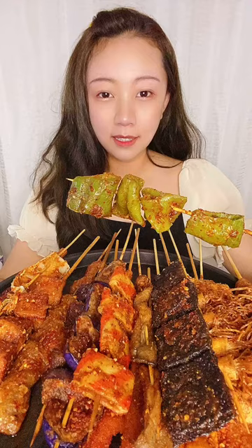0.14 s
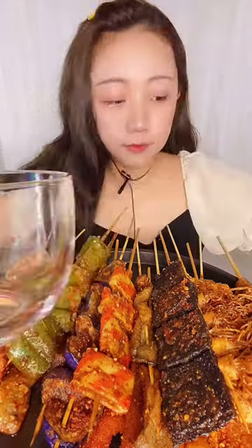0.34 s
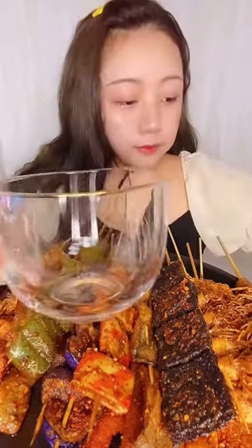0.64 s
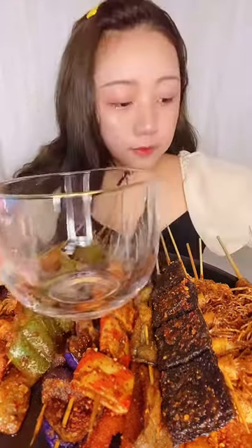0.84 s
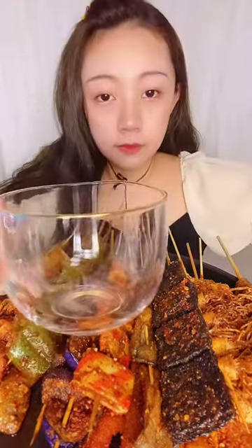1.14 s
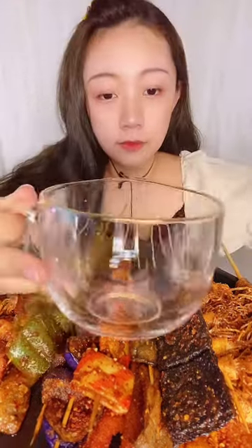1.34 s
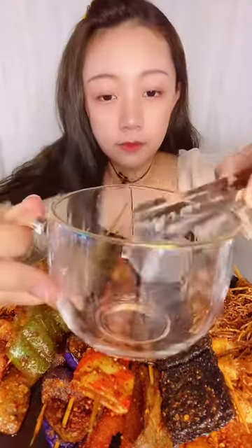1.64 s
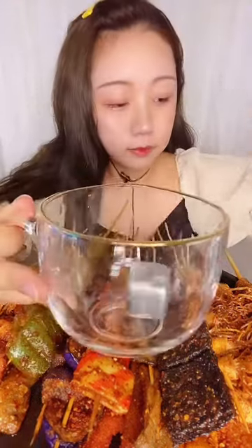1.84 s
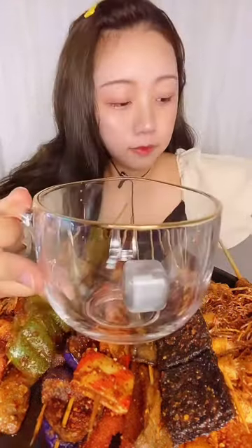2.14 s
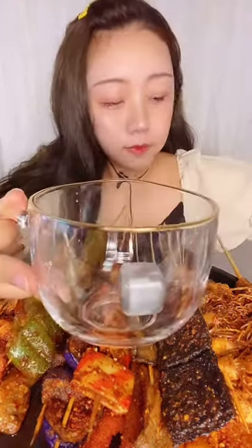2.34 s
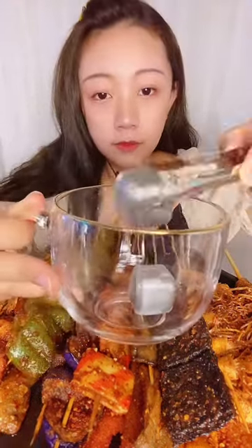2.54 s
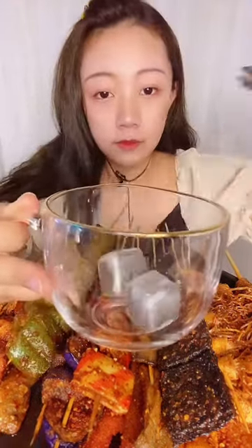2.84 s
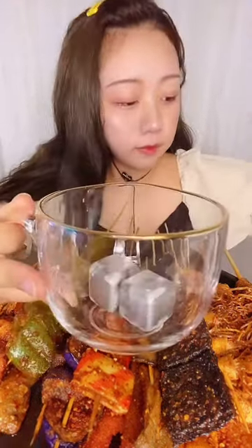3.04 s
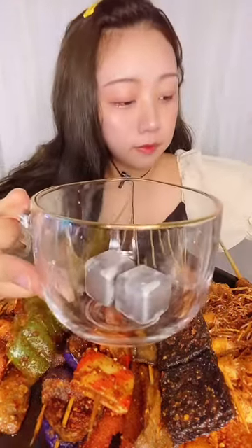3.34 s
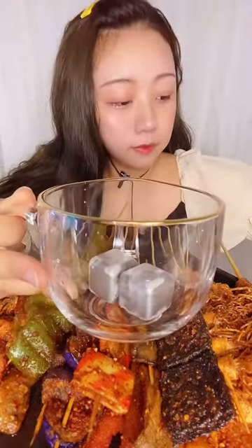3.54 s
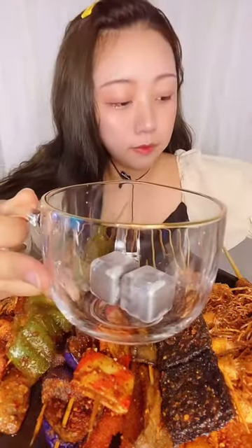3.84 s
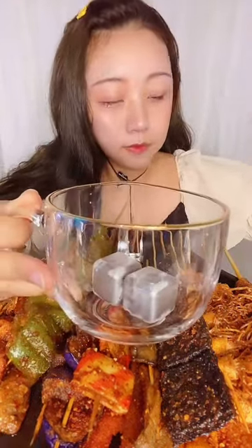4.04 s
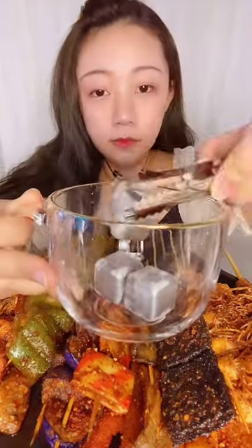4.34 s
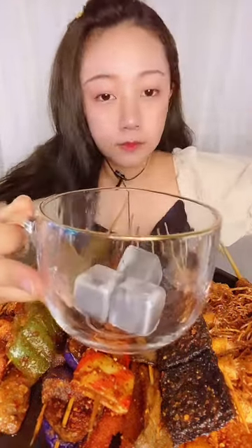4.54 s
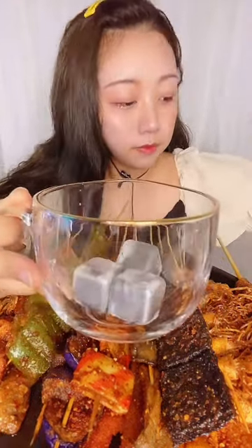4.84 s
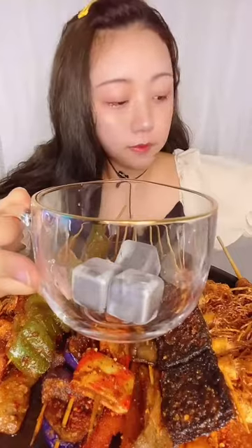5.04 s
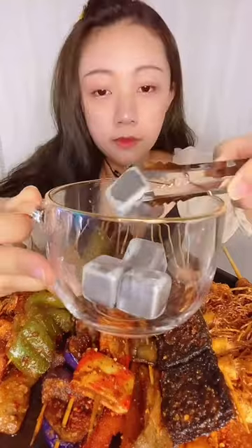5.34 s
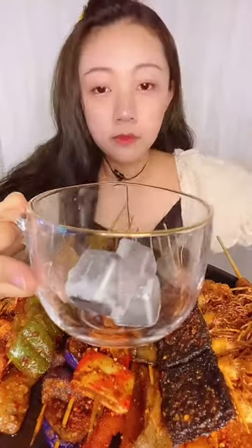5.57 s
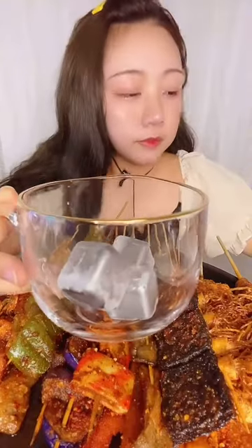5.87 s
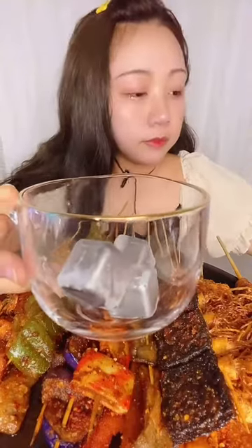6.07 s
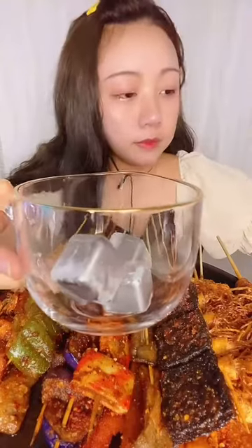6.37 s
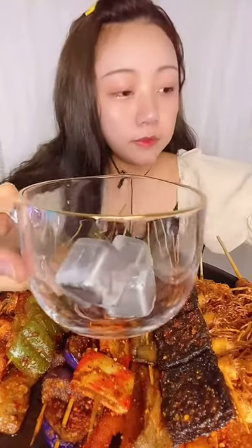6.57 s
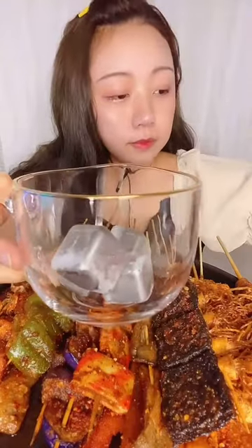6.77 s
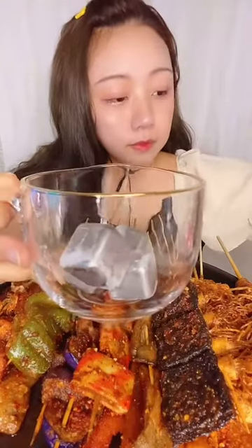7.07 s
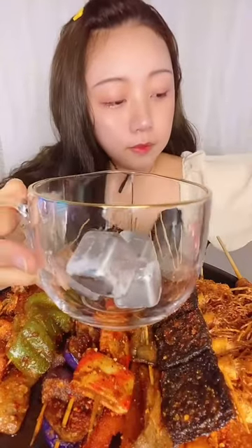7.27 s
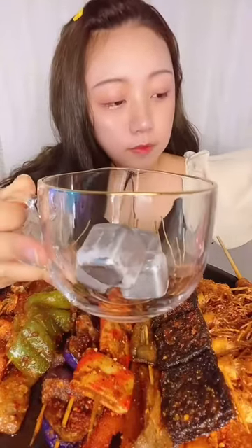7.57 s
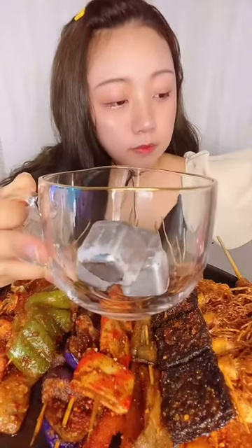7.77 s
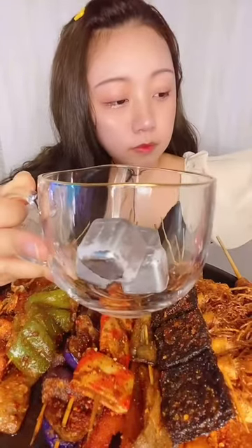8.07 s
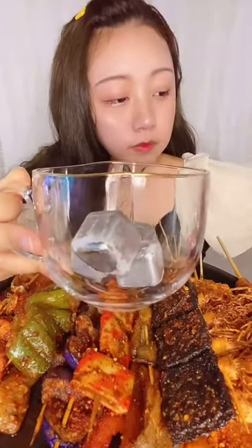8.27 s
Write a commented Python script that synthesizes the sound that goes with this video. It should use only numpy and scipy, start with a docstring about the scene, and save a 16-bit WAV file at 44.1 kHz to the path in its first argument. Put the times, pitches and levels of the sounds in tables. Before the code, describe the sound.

Silence for the first half second, then quiet room air with deep low rumble. Faint clicks and scrapes on a table from 0.5 to 1.3 s, with a soft thump near 1.2. At 1.6-2.0 an ice cube knocks and bounces in a glass mug very close by. Sharp table click at 2.25; a faint rim tap at 2.8, then a second cube clatters and slides at 3.0. Small clicks, scrapes and knocks run from 3.3 to 4.1. A third cube lands at 4.55 with a clearer glassy ring, and a fourth, loudest, at 5.55, followed by a bright metal tap on glass at 5.67. Tongs knock down at 6.1-6.6 with a tiny squeak; a heavy, boomy thud comes at 7.0. Can clicks begin at 7.25, a fierce whistling gas hiss bursts at 7.65 and fades within about 0.15 s. Tab ticks from 8.0, then the lid cracks at 8.17 with quickly fading fizz.

```python
"""A small room: ice cubes are dropped from metal tongs into a glass mug held close to the microphone.
Cubes strike, bounce and slide round the bowl (contact noise plus decaying modes); things click, scrape
and bump on the table (filtered noise). The tongs are laid down, a cola can is handled, its gas escapes
with a short whistling hiss (noise through resonances), the lid cracks open and the cola fizzes."""
import sys
import numpy as np
from scipy import signal
from scipy.fft import rfft, irfft
from scipy.io import wavfile

SR = 44100
rng = np.random.default_rng(int(sys.argv[2]) if len(sys.argv) > 2 else 0)


def to_wav(sig):
    """Store sig (one row per channel, or 1-D mono) as 16-bit WAV at the path in sys.argv[1].

    Samples outside -1..1 are clipped; the rate is SR.
    """
    pcm = np.clip(np.atleast_2d(sig), -1, 1) * 32767
    pcm = np.round(pcm).astype(np.int16)
    wavfile.write(sys.argv[1], SR, pcm.T)  # frames by channels


N = 370881
SIZE = 16384  # samples in one contact, ring or room tail
OPEN_S = 8.166  # the lid gives way

# Contact colours. Each row: frequency in Hz, relative density in dB per Hz.
ICE_COLOUR = [(150, -50), (450, -13.5), (700, -5.5), (950, 10.5), (1350, 4.5), (1750, -4.5), (2200, 4.5),
              (2750, -5), (6300, -1.5), (9000, -14), (11500, -10.5), (13000, -3.5), (14300, -4.5),
              (16000, -56.5)]
TABLE_COLOUR = [(100, -12.5), (200, -13), (370, -3.5), (570, -2.5), (750, -8), (1300, -7.5), (1900, -14),
                (2700, -12), (5700, -22), (9500, -25.5), (14000, -33.5), (16000, -48)]
CAN_COLOUR = [(120, -65.5), (200, -29.5), (491, -17), (569, -14), (899, -6.5), (1120, -14), (1740, -4.5),
              (2960, -14.5), (3760, -6.5), (5130, -12.5), (7970, -12.5), (8580, -15.5), (16000, -35)]

# Modes of the mug wall, of the wall split by the handle, of the air in the bowl and of the table top.
# Each row: frequency in Hz, relative level in dB, undamped t60 in s.
WALL_MODES = [(1495, 0, .25), (2165, -19, .2), (3210, -4, .2), (3236, -9, .18), (4500, -19, .2),
              (5665, -5, .15), (6290, -13, .13), (8300, -16, .14), (13100, -12, .11), (13600, -12, .1)]
TWIN_MODES = [(1362, -10, .25), (3460, -4, .3), (4683, -18, .18), (5674, 1, .22), (5720, -7, .12),
              (6180, -12, .1), (6874, -10, .16), (13080, -10, .08)]
BOWL_MODES = [(894, -3.5, 0.085), (920, -17, 0.17), (1074, -12, 0.037)]
TOP_MODES = [(286.4, -8, 0.21), (376.3, 7, 0.11), (536, 1, 0.08), (560, -2.5, 0.14)]


def gain_of(db):
    """Decibels to gain."""
    return 10 ** (np.asarray(db) / 20)


def read(points, hz):
    """Spectrum joined by straight lines over log frequency."""
    f, value = np.transpose(points)
    return np.interp(np.log(hz + 1), np.log(f + 1), value)


def unit(x):
    """Scales each channel to energy 1."""
    return x / np.sqrt(np.sum(abs(x) ** 2, -1, keepdims=True) + 1e-30)


def add(mix, s, sound):
    """Mixes a sound in at time s."""
    part = mix[:, round(s * SR):][:, :sound.shape[1]]
    part += sound[:, :part.shape[1]]


def causal(db):
    """Minimum-phase pulse with this spectrum, as mid and side a quarter turn apart."""
    log_gain = np.log(gain_of(np.maximum(db - db.max(), -90)))
    circle = np.concatenate([log_gain, log_gain[-2:0:-1]])
    spectrum = np.exp(np.conj(signal.hilbert(circle)))[:len(db)]
    return unit(irfft(np.array([spectrum, 1j * spectrum])))


def coloured(x, points):
    """Filters by a spectrum and sets the rms to 1."""
    gain = gain_of(read(points, np.fft.rfftfreq(N, 1 / SR)))
    return unit(irfft(rfft(x) * gain, N)) * np.sqrt(N)


def through(x, response):
    """Convolves and keeps the length."""
    return signal.fftconvolve(x, response, axes=1)[:, :x.shape[1]]


def swell(t, rise_s, fall_db_per_s, length_s, release_s):
    """Envelope that rises, sinks steadily while it lasts, then is released."""
    rise = np.clip(t / rise_s, 0, 1)
    fall = gain_of(-fall_db_per_s * np.maximum(t, 0))
    release = np.exp(-np.maximum(t - length_s, 0) / release_s)
    return rise * fall * release


def loudness(db, length_s=1 / 100):
    """Gain giving a sound of energy 1 this rms over its length; blows count as 10 ms."""
    return gain_of(db) * np.sqrt(SR * length_s)


def room(build_s=0.00057):
    """Diffuse tail that builds up quickly; the treble dies first."""
    # Each row: frequency in Hz, t60 in s.
    decay_times = [(200, 0.35), (530, 0.2), (1400, 0.21), (3700, 0.21), (9700, 0.14), (15000, 0.12)]
    hz, t, z = signal.stft(rng.standard_normal((2, SIZE)), SR, nperseg=256)
    decay = gain_of(-60 * t / read(decay_times, hz)[:, None])
    tail = signal.istft(z * decay, SR, nperseg=256)[1][:, :SIZE]
    build = 1 - np.exp(-(np.arange(SIZE) / SR / build_s) ** 2)
    return unit(tail * build)


def chatter(contact_s, clean_s=0.00063, grain_db=4):
    """Force of a blow: one clean tick if short, a swarm of tiny touches that swells and dies if long."""
    u = np.arange(SIZE) / SR / contact_s
    grain = gain_of(grain_db * np.repeat(rng.standard_normal(SIZE // 32), 32))
    touches = rng.standard_normal((2, SIZE)) * grain
    clean = np.exp(-contact_s / clean_s)
    force = np.sqrt(1 - clean) * unit(touches * u * np.exp(-1.3 * u))
    force[:, 0] += np.sqrt(clean)
    return force


def rubbing(length_s, rise_s=0.0072, fall_db=5, release_s=0.0043, grain_db=5.0):
    """Force of a slide: tiny catches of uneven size, weakening as the thing slows."""
    grain = gain_of(grain_db * np.repeat(rng.standard_normal(SIZE // 64), 64))
    catches = rng.standard_normal((2, SIZE)) * grain
    return unit(catches * swell(np.arange(SIZE) / SR, rise_s, fall_db / length_s, length_s, release_s))


def contact(force, colour, bass_db, treble_db, room_db):
    """Contact noise in the object's colour, with the room's answer."""
    hz = np.fft.rfftfreq(SIZE, 1 / SR)
    tilt = [(380, bass_db), (950, 0), (1900, 0.049), (5500, treble_db), (16000, 1.83 * treble_db)]
    sound = through(force, causal(read(colour, hz) + read(tilt, hz)))
    return sound + gain_of(room_db) * through(sound, room())


def ring(modes, contact_s, damping=1, spread_db=1, flutter_depth=0.81):
    """Modes swell during contact, then die away, fluttering as rattles and reflections cross them."""
    hz, db, t60 = np.transpose(modes)[:, :, None]
    t = np.arange(SIZE) / SR
    start_gain = gain_of(db + spread_db * rng.standard_normal(hz.shape))
    heights = start_gain * np.exp(-np.log(1000) * damping * t / t60)
    knots_s = np.arange(0, SIZE / SR + .012, .012)
    drift = rng.standard_normal((len(hz), len(knots_s), 2)) @ [1, 1j]
    flutter = 1 + flutter_depth * np.array([np.interp(t, knots_s, row) for row in drift])
    turns = np.exp(2j * np.pi * (hz * t + rng.random(hz.shape)))
    wave = (heights * flutter * turns).sum(0) * (1 - np.exp(-t / contact_s))
    return unit(np.array([wave.real, wave.imag]))


def background(air_db=-52.5, rumble_db=-30.0):
    """Quiet room air over a deep rumble, both as filtered noise."""
    # Each row: frequency in Hz, relative density in dB per Hz.
    air_colour = [(59, -31), (100, -3), (350, -11), (398, -11), (471, -11), (910, -16), (991, -16),
                  (2420, -28), (5650, -34.5), (9210, -36), (16000, -50.5)]
    rumble_colour = [(2, -4.5), (5, -21.5), (16, 8), (24, -27), (34, -11.5), (55, -15.5), (86, -32),
                     (150, -44), (300, -67)]
    air, rumble = rng.standard_normal((2, 2, N))
    return gain_of(air_db) * coloured(air, air_colour) + gain_of(rumble_db) * coloured(rumble, rumble_colour)


def knocks(bass_db=-6, bass_per_bright=0.88, room_db=-6, level_db=.5):
    """Things click on the table without ring; brightness lifts bass and treble around the middle."""
    # Each row: start in s, strength in dB before level_db, contact time in s, brightness in dB.
    clicks = [ (.518, -45.5, 0.01, -1), (.622, -49.5, .004, 3.5), (0.691, -36, 0.011, -11),
              (1.0285, -32, 0.0012, 3.5), (1.084, -37.5, 0.0034, 19), (1.3441, -35.5, 0.0012, -4.5),
              (2.2501, -18.5, 0.0013, 9.5), (2.258, -25, 0.0039, 0), (2.3982, -33, 0.0014, -1.5),
              (3.3387, -34, 0.0003, -2), (3.4578, -30.5, 0.00077, 11.5), (3.4912, -26.5, .0013, 1),
              (3.5423, -39.5, 0.00057, 11), (3.838, -27, 0.0013, -1), (3.8633, -20, 0.00089, 4),
              (3.9728, -27, 0.0033, 6), (4.0634, -22.5, .0018, 8.5), (4.9464, -30.5, 0.00061, 2.5),
              (5.085, -41.5, 0.0042, 8.5), (6.112, -21, 0.0017, -5), (6.196, -25.5, 0.0059, -19),
              (6.4903, -25, 0.00057, -4.5), (6.571, -14, 0.01, -5.5)]
    out = np.zeros((2, N))
    for s, db, contact_s, bright_db in clicks:
        bass = bass_db + bass_per_bright * bright_db
        sound = contact(chatter(contact_s), TABLE_COLOUR, bass, bright_db, room_db)
        add(out, s, loudness(db + level_db) * sound)
    return out


def bumps(room_db=-11, top_db=-5.0):
    """Soft, heavy blows make the table top boom."""
    # Each row: start in s, strength in dB, contact time in s, bass in dB, treble in dB,
    # ring of the top in dB before top_db.
    blows = [(1.167, -23, 0.019, -9, 1, 8.5), (1.253, -32, 0.0045, 2, 5, 5),
             (3.867, -30, 0.046, -4.5, 1.5, 13), (6.802, -25.5, 0.018, 17, 4.5, -14),
             (6.995, -13, .011, 7.5, -10, 3)]
    # Each row: frequency in Hz, relative density in dB per Hz.
    bump_colour = [(40, 3), (110, -2.5), (190, -6.5), (280, -5.5), (400, -3), (600, -5), (750, -5.5),
                   (1400, -9.5), (3000, -16), (16000, -26)]
    out = np.zeros((2, N))
    for s, db, contact_s, bass_db, treble_db, ring_db in blows:
        thud = contact(chatter(contact_s), bump_colour, bass_db, treble_db, room_db)
        boom = gain_of(top_db + ring_db) * ring(TOP_MODES, contact_s)
        add(out, s, loudness(db) * (thud + boom))
    return out


def scrapes(bass_db=-3, bass_per_bright=1.0, room_db=-5, top_db=-9):
    """Brief, jerky drags in the table's colour set its top humming a little."""
    # Each row: start in s, length in s, level in dB, brightness in dB.
    drags = [ (1.208, 0.092, -43, 6), (2.173, 0.13, -47, 0), (2.322, 0.1, -48, 3.5),
             (3.297, 0.037, -39, 4.5), (3.392, 0.072, -49.5, 6.5), (3.614, 0.034, -36.5, 4),
             (3.82, 0.043, -40.5, 4), (3.974, .025, -42, -10), (4.09, 0.029, -31.5, 6.5),
             (4.919, 0.19, -45, 4.5), (5.171, 0.012, -43, 10.5), (5.936, 0.027, -46, 8.5),
             (6.166, 0.048, -36.5, -4), (6.445, 0.1, -41, 0.5)]
    out = np.zeros((2, N))
    for s, length_s, db, bright_db in drags:
        force = rubbing(length_s, rise_s=.014, grain_db=4.5)
        sound = contact(force, TABLE_COLOUR, bass_db + bass_per_bright * bright_db, bright_db, room_db)
        hum = gain_of(top_db) * ring(TOP_MODES, length_s)
        add(out, s, loudness(db, length_s) * (sound + hum))
    return out


def cubes(bass_db=1, bass_per_bright=2, room_db=-5, room_per_ring=0.21, wall_db=-3,
          twin_db=-15, twin_per_ring=0.49, bowl_db=-11, level_db=-1):
    """Blows ring the wall, its twin modes and the bowl air; bright ones have less middle, dead ones less tail."""
    # Each row: start in s, strength in dB before level_db, contact time in s, brightness in dB,
    # ring of the wall in dB before wall_db.
    hits = [ (1.6382, -17.5, 0.0021, 12.5, -52), (1.82, -25, 0.0065, 11.5, -9),
            (1.8515, -13.5, 0.00075, 2, -11), (1.89, -32, 0.0044, -8, 16.5), (1.9208, -16, 0.0031, 2, -9.5),
            (2.046, -33.5, 0.0057, -10, -8), (2.9818, -15.5, 0.0006, 4.5, 1),
            (3.006, -19.5, 0.0029, 4, -0.5), (3.031, -22, 0.0033, 4, 4),
            (3.0955, -22.5, 0.00047, 6.5, -5.5), (4.537, -25.5, 0.0027, 7, 7),
            (4.5508, -12.5, 0.0028, 5, 1.5), (4.567, -12.5, .0035, 0.5, 10), (4.582, -22.5, .0016, 4, 15),
            (5.544, -14, 0.0058, 2.5, 10), (5.5804, -9.5, 0.00086, 3.5, -22)]
    out = np.zeros((2, N))
    for s, db, contact_s, bright_db, ring_db in hits:
        bass = bass_db + bass_per_bright * bright_db
        tail_db = room_db + room_per_ring * ring_db
        sound = contact(chatter(contact_s), ICE_COLOUR, bass, bright_db, tail_db)
        sound = sound + gain_of(wall_db + ring_db) * ring(WALL_MODES, contact_s)
        sound = sound + gain_of(twin_db + twin_per_ring * ring_db) * ring(TWIN_MODES, contact_s)
        sound = sound + gain_of(bowl_db) * ring(BOWL_MODES, contact_s)
        add(out, s, loudness(db + level_db) * sound)
    return out


def slides(bass_db=5, treble_db=0, room_db=-8, wall_db=-14, bowl_db=-11):
    """A cube skids round the bowl and keeps the glass faintly ringing."""
    # Each row: start in s, length in s, level in dB.
    skids = [(1.86, 0.13, -41), (2.909, 0.051, -31), (3.045, 0.08, -30.5), (4.595, 0.052, -26),
             (5.591, 0.031, -24)]
    out = np.zeros((2, N))
    for s, length_s, db in skids:
        sound = contact(rubbing(length_s), ICE_COLOUR, bass_db, treble_db, room_db)
        sound = sound + gain_of(wall_db) * ring(WALL_MODES, length_s)
        sound = sound + gain_of(bowl_db) * ring(BOWL_MODES, length_s)
        add(out, s, loudness(db, length_s) * sound)
    return out


def tongs(tick_db=-2, bass_db=-8, treble_db=2, room_db=-6, ring_db=2):
    """Metal on the rim is mostly ring; the place of the touch shares it between two sets of modes."""
    # Each row: start in s, strength in dB, contact time in s, share of the twin modes 0-1,
    # damping by the tongs as a factor on the decay rate (1 = free).
    taps = [(2.793, -36, 0.0097, 0.84, 3.3), (2.822, -41, 0.0011, 0.86, 1.3),
            (2.834, -43.5, 0.00083, 1, 3.2), (4.343, -45.5, 0.00055, 0, 2.6),
            (5.495, -37.5, 0.039, 0, 0.87), (5.672, -17, 0.00045, 0.99, 1.51)]
    out = np.zeros((2, N))
    for s, db, contact_s, share, damping in taps:
        twin = np.clip(share, 0, 1)
        ringing = np.sqrt(1 - twin) * ring(WALL_MODES, contact_s, damping)
        ringing = ringing + np.sqrt(twin) * ring(TWIN_MODES, contact_s, damping)
        tick = contact(chatter(contact_s), ICE_COLOUR, bass_db, treble_db, room_db)
        add(out, s, loudness(db) * (gain_of(tick_db) * tick + gain_of(ring_db) * ringing))
    return out


def squeak(jitter=0.012):
    """Stick and slip on a smooth surface: a brief, slightly unsteady tone with overtones."""
    # Each row: time in s, mean pitch in Hz, relative level in dB.
    glide = [(6.52, 916, -58), (6.53, 916, -35), (6.546, 918, -36), (6.559, 880, -44)]
    # Each row: multiple of the pitch, relative level in dB.
    partials = [(1, -2), (2, 1), (3, -9), (4, -12), (5, -24)]
    s, hz, db = np.transpose(glide)
    t = np.arange(s[0], s[-1], 1 / SR)
    unsteady = np.repeat(rng.standard_normal(len(t) // 48 + 1), 48)[:len(t)]
    turns = np.cumsum(np.interp(t, s, hz) * (1 + jitter * unsteady)) / SR
    tone = sum(gain_of(part_db) * np.sin(2 * np.pi * round(k) * turns) for k, part_db in partials)
    out = np.zeros((2, N))
    add(out, s[0], gain_of(np.interp(t, s, db)) * tone[None])  # mid and side alike
    return out


def can(bass_db=-1, bass_per_bright=0.76, sealed_room_db=-8, open_room_db=-2, shell_db=-4, level_db=2):
    """The tab clicks on the sealed can, then tears the lid; the open can rings in other modes."""
    # Each row: start in s, strength in dB before level_db, contact time in s, brightness in dB,
    # ring of the can in dB before shell_db.
    tab_hits = [ (7.245, -36, 0.019, 10.5, -29), (7.371, -39, 0.015, 7, -19),
                (7.649, -21, 0.0057, 14, -9.5), (7.7605, -38.5, 0.00027, -23, 3.5),
                (8.0125, -45, .0004, 11, 6), (8.025, -31, 0.0012, 10, -2), (8.0429, -18, 0.0011, 9.5, -21),
                (8.064, -48, 0.0068, -6, 0), (8.1047, -28.5, .0013, 3, -2.5), (8.155, -24, .0017, 7, 1),
                (8.162, -13, 0.002, 8, -27), (8.171, -15.5, 0.0045, 5, 2.5)]
    # Each row: frequency in Hz, relative level in dB, t60 in s.
    sealed_modes = [(1720, 2, .18), (3730, -2, .12), (5650, -2, .14), (7930, 0, .1), (9050, -5, .1)]
    open_modes = [(886, 2, .19), (2023, -4, .17), (3838, -2, .2), (4162, -1, .2), (4578, -1, .2),
                  (4885, -3, .18), (6444, -4, .18), (7080, -4, .18)]
    out = np.zeros((2, N))
    for s, db, contact_s, bright_db, ring_db in tab_hits:
        modes, room_db = (sealed_modes, sealed_room_db) if s < OPEN_S else (open_modes, open_room_db)
        bass = bass_db + bass_per_bright * bright_db
        click = contact(chatter(contact_s), CAN_COLOUR, bass, bright_db, room_db)
        shell = gain_of(shell_db + ring_db) * ring(modes, contact_s)
        add(out, s, loudness(db + level_db) * (click + shell))
    return out


def spray(level, colour, bursts_per_s, burst_share, room_db):
    """Rushing gas (steady noise) mixed with tiny bursting droplets (sparse impulses)."""
    bursts = rng.standard_normal((2, N)) * (rng.random(N) < bursts_per_s / SR)
    rush = rng.standard_normal((2, N))
    share = np.clip(burst_share, 0, 1)
    sound = np.sqrt(share) * coloured(bursts, colour) + np.sqrt(1 - share) * coloured(rush, colour)
    sound = level * sound
    return sound + gain_of(room_db) * through(sound, room())


def whistling(x):
    """The slit in the lid whistles: narrow resonances stand out of the rushing gas."""
    # Each row: frequency in Hz, width in Hz, level over the hiss in dB.
    whistles = [(7240, 34, 14), (8470, 40, 11), (9852, 35, 12), (10100, 39, 16.5), (10580, 90, 11),
                (11370, 40, 14)]
    hz = np.fft.rfftfreq(N, 1 / SR)
    lift = 1 + sum((gain_of(db) - 1) / (1 + 2j * (hz - centre) / width) for centre, width, db in whistles)
    return irfft(rfft(x) * lift, N)


def gas(start_s=7.645, level_db=-7, rise_s=0.017, length_s=.12, fall_db_per_s=186, release_s=0.0044):
    """Gas bursts out through the first slit in the lid, weakens as the pressure falls, and stops."""
    # Each row: frequency in Hz, relative density in dB per Hz.
    gas_colour = [(400, -19), (1000, -20.5), (1750, -16), (2800, -18.5), (3600, -9), (6000, -6.5),
                  (7500, -1), (8000, -0.5), (8600, 0.5), (9300, 0), (10150, 1.5), (11400, -1), (14500, 1.5),
                  (16000, -8.5)]
    t = np.arange(N) / SR - start_s
    level = gain_of(level_db) * swell(t, rise_s, fall_db_per_s, length_s, release_s)
    return whistling(spray(level, gas_colour, bursts_per_s=1200, burst_share=0.14, room_db=-11))


def fizz(level_db=-42.5, rise_s=0.034, fall_db_per_s=58):
    """Bubbles burst inside the open can and calm down."""
    t = np.arange(N) / SR - OPEN_S
    level = gain_of(level_db) * swell(t, rise_s, fall_db_per_s, length_s=1, release_s=1)
    return spray(level, CAN_COLOUR, bursts_per_s=750, burst_share=0.5, room_db=-8)


def scene():
    """Sums all sources in mid and side, narrows all but the treble, and returns left and right."""
    # Each row: frequency in Hz, side gain in dB.
    width = [(200, -55), (1400, -48.5), (2700, -37), (3250, -24), (4500, -13.5), (8000, -0.5),
             (10500, -12.5), (13000, -7)]
    table = knocks() + bumps() + scrapes() + squeak()
    mug = cubes() + slides() + tongs()
    mid, side = background() + table + mug + can() + gas() + fizz()
    side = irfft(rfft(side) * gain_of(read(width, np.fft.rfftfreq(N, 1 / SR))), N)
    return np.array([mid + side, mid - side])


def levelled(x, threshold_db=-24, squeeze=0.28, recovery_db_per_s=160):
    """Gain control: loud passages push everything down, then the gain recovers steadily."""
    power = signal.lfilter([1 / 200], [1, -199 / 200], (x ** 2).mean(0))
    fall_db = np.arange(N) / SR * recovery_db_per_s
    held_db = np.maximum.accumulate(10 * np.log10(power + 1e-12) + fall_db) - fall_db
    return x * gain_of(-np.clip(squeeze, 0, 1) * np.maximum(held_db - threshold_db, 0))


def record(dry, start_s=.513, edge_hz=15900):
    """Gain control, clipping at full scale, silence until the sound is switched on, then a low-pass."""
    switch = np.clip((np.arange(N) / SR - start_s) / .005, 0, 1)
    live = np.clip(levelled(dry), -1, 1) * switch
    low_pass = signal.firwin(511, edge_hz, window=("kaiser", 9), fs=SR)
    return signal.oaconvolve(live, low_pass[None], "same")


dry = scene()
out = record(dry)
to_wav(out)
```